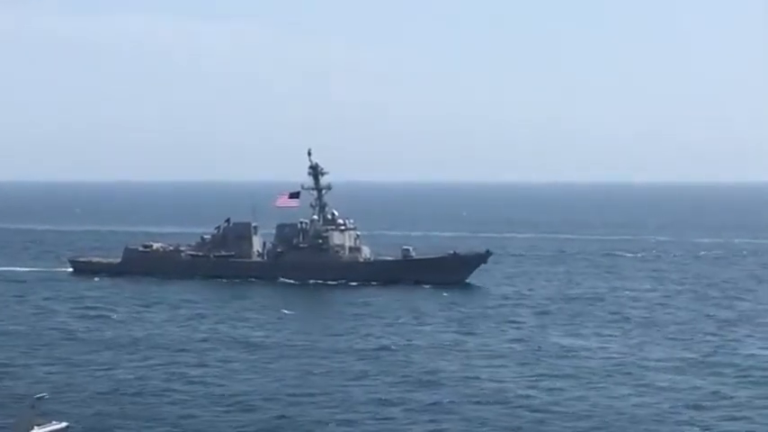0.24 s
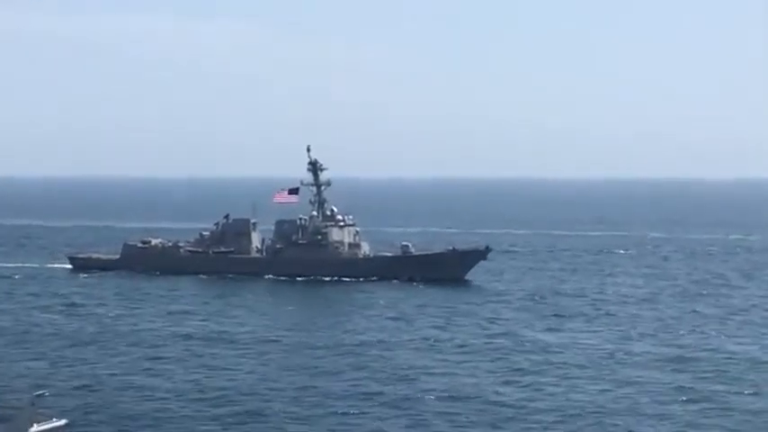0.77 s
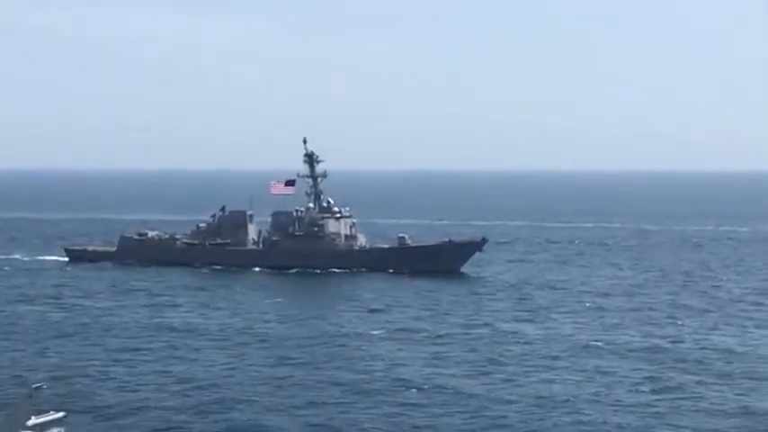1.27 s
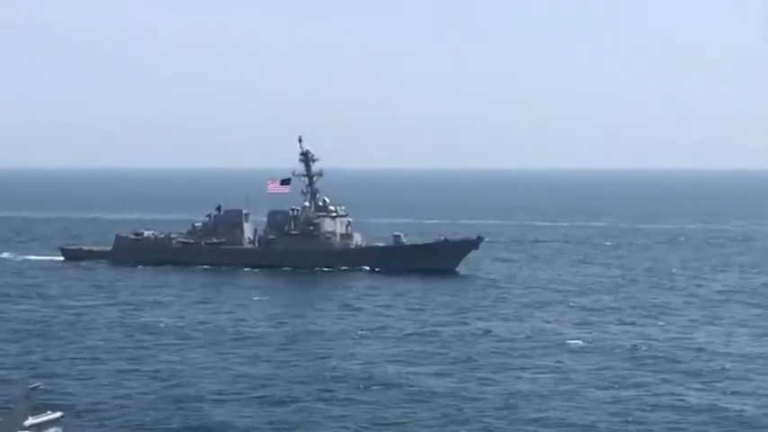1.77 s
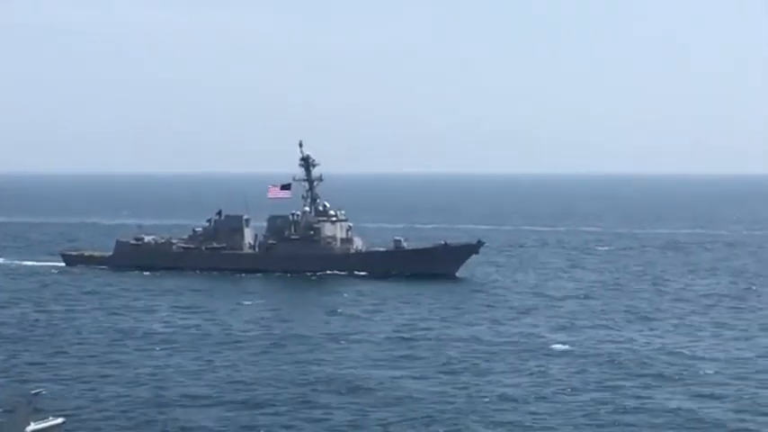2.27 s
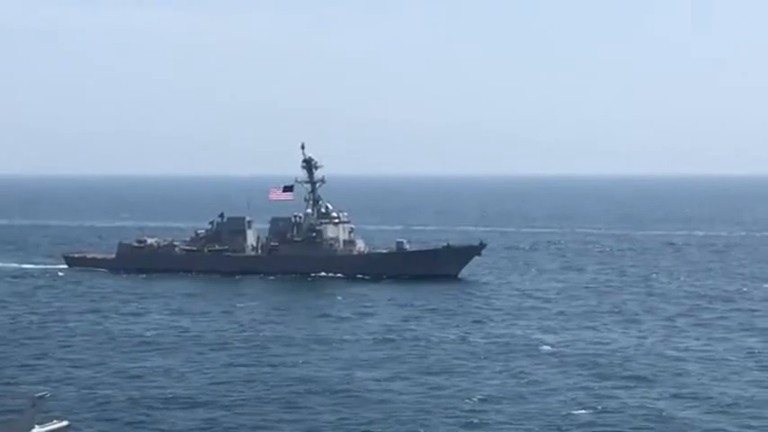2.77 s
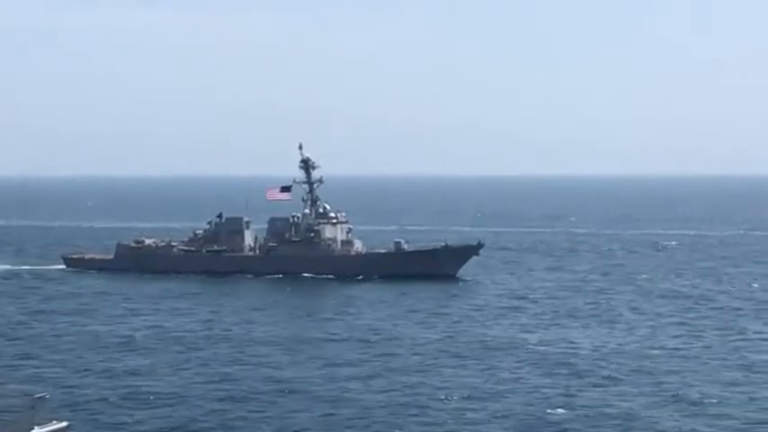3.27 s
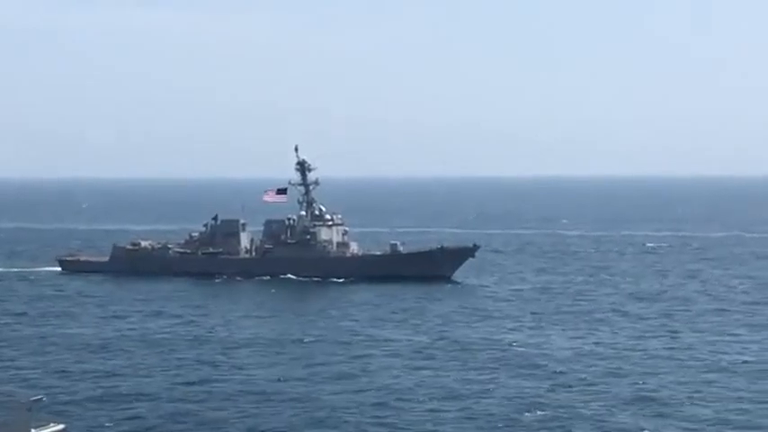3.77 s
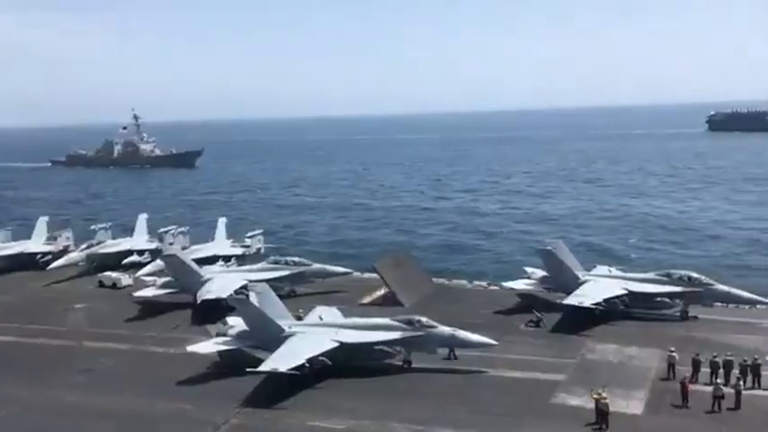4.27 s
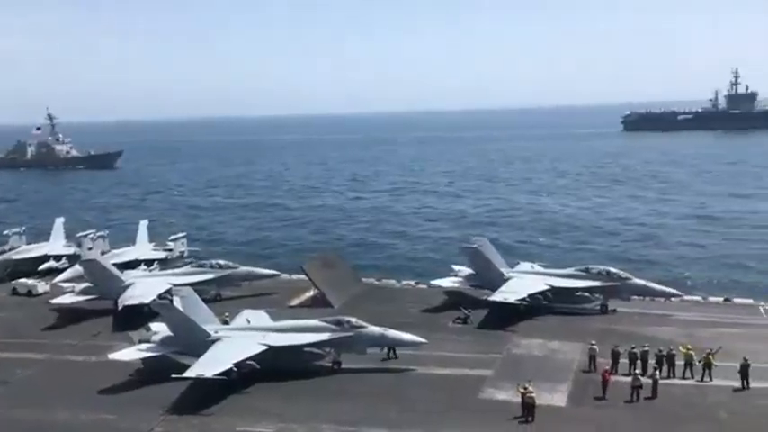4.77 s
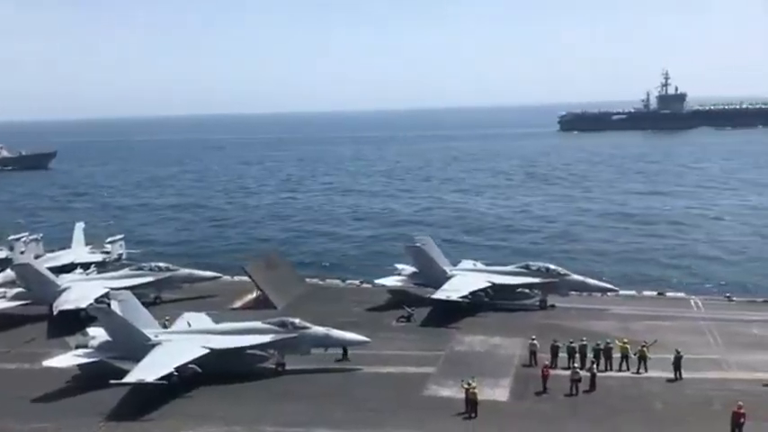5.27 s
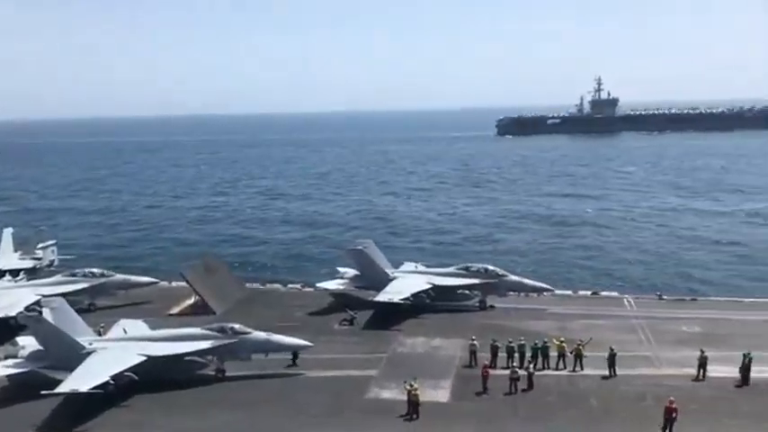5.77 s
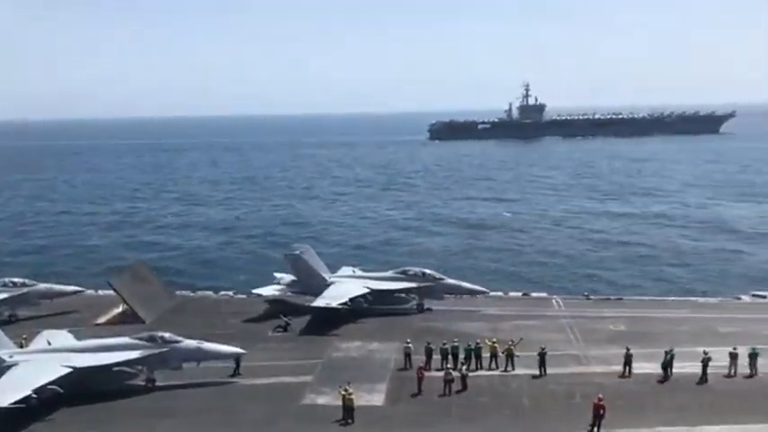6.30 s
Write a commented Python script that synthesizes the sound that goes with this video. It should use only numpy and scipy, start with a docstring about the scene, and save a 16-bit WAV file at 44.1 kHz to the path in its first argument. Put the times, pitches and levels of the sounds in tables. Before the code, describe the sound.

Wind thumps on a microphone above a flight deck at sea while idling turbines drone and whine, their high tones fluttering in the gusts. A faint hollow note rises just before a sudden change to the full exhaust roar of taxiing jets. The roar howls briefly, breaks off for a split second, and continues with a low throbbing underneath as the wind rumbles harder.

```python
"""A low drone and fuzzy whines that flare and fade in moving air: jet turbines idling on a carrier's
flight deck, heard from high above. Near 4 s the scene cuts to the full exhaust roar of taxiing jets,
turbulent noise with one short howl and a low throb. The sound drops out once for an instant.
Wind buffets the microphone throughout."""
import sys
import numpy as np
from scipy import signal
from scipy.fft import rfft, irfft
from scipy.io import wavfile

SR = 44100
rng = np.random.default_rng(int(sys.argv[2]) if len(sys.argv) > 2 else 0)


def inscribe(sig):
    """Save sig as 16-bit PCM at rate SR to the path in sys.argv[1].

    A 1-D sig is mono; a 2-D sig holds one channel per row.
    Samples are clipped to [-1, 1] before scaling.
    """
    pcm = np.round(np.clip(np.atleast_2d(sig).T, -1, 1) * 32767)
    wavfile.write(sys.argv[1], SR, pcm.astype(np.int16))


N = 288414
TIME = np.arange(N) / SR
HOP = 256
FRAME_S = np.arange(N // HOP + 6) * HOP / SR
BIN_HZ = np.fft.rfftfreq(4 * HOP, 1 / SR)
CUT_S = 3.9535  # idle to roar

# Exhaust spectrum: f/Hz, relative level/dB
ROAR_SPECTRUM = [(60, -16.5), (130, -6), (380, -5), (520, -5.5), (900, -4), (1450, -5.5), (1800, -5.5),
                 (2600, -8), (4200, -10.5), (4950, -14), (5900, -13), (7700, -19.5), (9400, -20),
                 (10450, -26), (11300, -23), (12400, -25.5)]
# Spectral hump, shifting as the jets turn: t/s, f/Hz, lift/dB
ROAR_HUMP = [(3.98, 900, 2.5), (4.2, 900, 2), (4.35, 900, 3), (4.68, 1000, 3.5), (4.9, 990, 4.5),
             (5.05, 980, 5.5), (5.28, 1000, 6.5), (5.42, 1000, 4.6), (5.62, 1002, 7.2), (5.86, 990, 3.5),
             (6.1, 970, 5), (6.4, 1000, 6.5)]
# Deck echo as the jets move: t/s, lag/ms
DECK_ECHO = [(4.0, 1.3), (4.2, 1.2), (4.7, 0.88), (5.4, 1.36), (6.5, 0.66)]
# Roar treble: t/s, level/dB
SIZZLE_LEVEL = [(4.03, -25.7), (4.14, -26.5), (4.31, -24.5), (4.58, -27.5), (4.73, -24), (4.88, -24),
                (5.04, -27.5), (5.14, -25), (5.44, -26), (5.56, -27), (5.72, -28), (5.88, -24),
                (6.1, -25.5), (6.5, -24.5)]

def exhaust_roar():
    """Jet mixing noise, lightly combed by the deck echo. The body eases off as the jets move away."""
    hump_hz, lift_db = follow(ROAR_HUMP, FRAME_S[:, None])
    hump_db = lift_db * bell(BIN_HZ, hump_hz, width=430)
    turn_away = np.exp(-abs(FRAME_S - CUT_S) / 0.49)
    shoulder_db = 2 * np.outer(turn_away, bell(BIN_HZ, 1550, width=720))
    lag_ms, = follow(DECK_ECHO, FRAME_S)
    comb_db = 0.5 * np.cos(2 * np.pi * np.outer(lag_ms / 1000, BIN_HZ)) * np.exp(-BIN_HZ / 5000)
    field_db = spectrum_at(ROAR_SPECTRUM, BIN_HZ) + hump_db + shoulder_db + comb_db
    jet = turbulence(field_db, patchy_db=1.4, patch_hz=80, patch_s=0.06)
    crossover_hz, fall_db_per_s = 2790, 0.64
    body = filtered(jet, lambda hz: 1 / (1 + (hz / crossover_hz) ** 4))
    sizzle_db, = follow(SIZZLE_LEVEL)
    sizzle = gain_of(sizzle_db + drift(rate_hz=35)) * unit_rms(jet - body)
    body_db = -20 - fall_db_per_s * (TIME - CUT_S) + 0.57 * drift(rate_hz=18)
    return gain_of(body_db) * unit_rms(body) + sizzle


# Throbbing bands: f/Hz, width/Hz, relative level/dB
BOOM_BANDS = [(170, 83, -3), (290, 60, -2.5)]
# Their swells: t/s, length/s, lower band lift/dB, upper band lift/dB
BOOM_LIFTS = [(4.6, 0.25, 14.5, 8), (5.008, 0.065, 12, 13), (5.4, 0.25, 2.5, 8.5), (5.76, 0.4, 11.5, 9),
              (6.18, 0.25, 8.5, 7)]

def exhaust_boom():
    """The largest exhaust eddies throb in two low bands."""
    out = 0
    for band, (hz, width_hz, band_db) in enumerate(BOOM_BANDS):
        swell_db = swells([(s, length_s, lifts[band]) for s, length_s, *lifts in BOOM_LIFTS])
        level_db = -36.5 + band_db + swell_db + 1.2 * drift(rate_hz=11)
        out += gain_of(level_db) * noise_band(hz, width_hz, steadiness=0.2)
    return out


def exhaust_howl():
    """The exhaust surges once in a hollow band."""
    surge = gain_of(-21) * bell(TIME, 4.108, width=0.064)
    return surge * noise_band(860, width_hz=480, steadiness=0.6)


# Intake spectrum: f/Hz, relative level/dB
HISS_SPECTRUM = [(500, -27), (1300, -6), (1700, 4.5), (2200, 1), (4600, -1.5), (4820, -5.5), (5020, 2.5),
                 (5400, -1.5), (5850, -2.5), (6500, -6.5), (7600, -10), (9000, -10.5), (10400, -16.5),
                 (11000, -13), (11800, -12.5), (12400, -14.5)]
# Gusts carrying the treble to the microphone: t/s, length/s, lift/dB
TREBLE_SURGES = [(.425, 0.068, 5), (.8, 0.25, 2.5), (1.97, 0.066, 2.5), (2.26, 0.11, 3), (2.69, 0.11, 6),
                 (3.0, 0.13, 4), (1.16, .2, 2), (3.72, .09, 1)]
# Compressor whines: f/Hz, width/Hz, level/dB, rms fading/dB
COMPRESSOR_WHINES = [(3020, 69, -51.5, -0.5), (5040, 102, -40, 2.2), (6055, 175, -47.5, 3),
                     (7070, 240, -50.5, 1.5), (8100, 220, -55.5, 1.5), (9050, 300, -61, 2)]
# Whines that flare on their own: f/Hz, width/Hz, flare width/Hz, base level/dB, rms flutter/dB
FLARING_WHINES = [(2010, 45, 8, -47, 1.5), (4018, 70, 80, -51, 2), (11350, 550, 550, -46, 2)]
# Flares of the low, middle and top whine: t/s, length/s, lift/dB
FLARES_LOW = [(0.413, .028, 12.5), (0.644, .03, 11), (1.294, .046, 14), (1.402, 0.04, 13.5),
              (2.22, 0.07, 9), (2.42, .04, 9), (2.66, .05, 8), (3.0, .04, 6)]
FLARES_MID = [(.79, 0.12, 8), (1.0, 0.06, 10), (1.2, .03, 11), (2.01, 0.1, 7), (3.053, .07, 11)]
FLARES_TOP = [(.41, 0.083, 3), (0.828, 0.054, 7), (1.243, 0.081, 11.5), (1.48, 0.093, 6), (1.772, .05, 8),
              (3.427, 0.1, 5.5), (3.68, 0.25, 4.5)]

def idle_intake():
    """Intake hiss and compressor whines, fluttering as the wind bends their path."""
    surge_db = swells(TREBLE_SURGES) + 0.47 * drift(rate_hz=10)
    sway = spectrum_at([(1500, 0.098), (5500, 1.0)], BIN_HZ)  # short waves bend most
    field_db = spectrum_at(HISS_SPECTRUM, BIN_HZ) + np.outer(np.interp(FRAME_S, TIME, surge_db), sway)
    out = gain_of(-34) * turbulence(field_db, patchy_db=1.5, patch_hz=600, patch_s=0.018)
    for hz, width_hz, base_db, fading_db in COMPRESSOR_WHINES:
        level_db = base_db + 0.95 * surge_db + fading_db * drift(rate_hz=75)
        out += gain_of(level_db) * noise_band(hz, width_hz, steadiness=0.087)
    for whine, flares in zip(FLARING_WHINES, (FLARES_LOW, FLARES_MID, FLARES_TOP)):
        hz, width_hz, flare_width_hz, base_db, flutter_db = whine
        level_db = base_db + flutter_db * drift(rate_hz=26)
        out += gain_of(level_db) * noise_band(hz, width_hz, steadiness=0.24)
        flare = np.sqrt(np.maximum(gain_of(swells(flares)) ** 2 - 1, 0))  # powers add
        out += gain_of(base_db) * flare * noise_band(hz, flare_width_hz, steadiness=1)
    return out * gain_of(0.5 * drift(rate_hz=71))


# Idle exhaust spectrum: f/Hz, relative level/dB
DRONE_SPECTRUM = [(60, -28), (115, -19), (140, -9), (172, 2), (225, 3), (330, -3.5), (410, -7.5), (550, -4),
                  (620, -10.5), (760, -8), (990, -7), (1200, -13.5), (1500, -18), (3000, -37.5)]
# Its low middle: t/s, lift/dB
DRONE_MID_LIFT = [(0, -0.5), (.55, -1), (.92, 0.5), (1.1, 2.6), (2.05, 2), (2.55, -4), (3.1, 2.5),
                  (3.55, -1), (3.9, 1)]
# Its bass swells and sags: t/s, length/s, lift/dB
DRONE_BASS_SWELLS = [(.53, 0.088, -4.5), (1.65, 0.27, 1.3), (2.15, 0.34, -0.8), (2.66, 0.19, -4),
                     (3.38, .1, -7), (3.85, .2, 1.5)]
# Hollow note: t/s, level/dB
MOAN_LEVEL = [(0, -50), (3.2, -44), (3.5, -35.5), (3.7, -36.5), (3.95, -40)]

def idle_drone():
    """Dull exhaust noise of idling engines. A hollow note rises out of it."""
    lift_db, = follow(DRONE_MID_LIFT, FRAME_S[:, None])
    mid_db = lift_db * bell(BIN_HZ, 516, width=320)
    bass_db = swells(DRONE_BASS_SWELLS, FRAME_S[:, None]) * (BIN_HZ < 350)
    field_db = spectrum_at(DRONE_SPECTRUM, BIN_HZ) + mid_db + bass_db
    drone = turbulence(field_db, patchy_db=1.2, patch_hz=60, patch_s=0.06)
    drone *= gain_of(-28.5 + 0.57 * drift(rate_hz=45))
    moan_db, = follow(MOAN_LEVEL)
    return drone + gain_of(moan_db) * noise_band(690, width_hz=70, steadiness=0)


# Buffeting spectrum: f/Hz, relative level/dB
WIND_SPECTRUM = [(15, -14), (30, -17), (52, -2), (85, 2.5), (120, -15), (200, -4), (500, -53)]
# Gusts and lulls: t/s, length/s, lift/dB
GUSTS = [(.29, 0.055, 7.5), (.7, 0.34, -4), (1.36, 0.17, 3), (1.65, 0.17, -10), (2.46, 0.26, 9),
         (2.69, 0.063, 8), (3.39, 0.1, 8), (3.8, 0.23, -6), (4.25, 0.4, 3), (5.09, .07, 7), (5.79, 0.29, 9)]

def wind():
    """Eddies buffet the microphone in low lumps, harder after the cut."""
    gust_db = np.where(TIME < CUT_S, -43, -38.5) + swells(GUSTS)
    rumble = filtered(rng.standard_normal(N), lambda hz: gain_of(spectrum_at(WIND_SPECTRUM, hz)))
    return gain_of(gust_db + 2 * drift(rate_hz=9)) * unit_rms(rumble)


# Diffuse hiss spectrum: f/Hz, relative level/dB
DIFFUSE_SPECTRUM = [(3400, -47), (4300, -20), (5600, -3.5), (7300, -13), (9400, -5), (10500, 1),
                    (11400, 3.5), (12400, -7)]

def diffuse_hiss():
    """Faint hiss, opposite in the two ears, widens the treble until just after the cut."""
    level_db = -48 + 1.6 * drift(rate_hz=16)
    hiss = turbulence(spectrum_at(DIFFUSE_SPECTRUM, BIN_HZ), patchy_db=4, patch_hz=700, patch_s=0.042)
    side = gain_of(level_db) * hiss * (TIME < 4.3)
    return np.array([side, -side])


def turbulence(field_db, patchy_db, patch_hz, patch_s):
    """Noise of rms 1 shaped by field_db, fading in random patches of time and frequency."""
    real, imag, patches = rng.standard_normal((3, len(FRAME_S), len(BIN_HZ)))
    taps = np.arange(-64, 65)
    blur = np.outer(bell(taps * HOP / SR, 0, patch_s), bell(taps * BIN_HZ[1], 0, patch_hz))
    patches = unit_rms(signal.fftconvolve(patches, blur, "same"))
    spectra = (real + 1j * imag) * gain_of(field_db + patchy_db * patches)
    _, noise = signal.istft(spectra.T, nperseg=4 * HOP, noverlap=3 * HOP)
    return unit_rms(noise[:N])


def noise_band(centre_hz, width_hz, steadiness):
    """A tone smeared by unsteady flow, rms 1. Steadiness (0 to 1) flattens its envelope."""
    band = filtered(rng.standard_normal(N), lambda hz: np.sqrt(bell(hz, centre_hz, width_hz)))
    power = abs(signal.hilbert(unit_rms(band))) ** 2
    return unit_rms(band / (power + 0.2) ** (steadiness / 2))


def drift(rate_hz):
    """Random wander of rms 1, up to about rate_hz."""
    hz = np.fft.rfftfreq(len(FRAME_S), HOP / SR)
    spectrum = rfft(rng.standard_normal(len(FRAME_S))) * (hz > 0) / (1 + (hz / rate_hz) ** 2)
    return np.interp(TIME, FRAME_S, unit_rms(irfft(spectrum, len(FRAME_S))))


def swells(rows, t=TIME):
    """Sum of bell-shaped lifts, in dB."""
    return sum(lift_db * bell(t, s, length_s) for s, length_s, lift_db in rows)


def bell(x, centre, width):
    """Gaussian of height 1; full width at half height, in the units of x."""
    return 2 ** -((2 * (x - centre) / width) ** 2)


def follow(rows, t=TIME):
    """Table columns interpolated at times t."""
    times, *columns = np.transpose(rows)
    return [np.interp(t, times, column) for column in columns]


def spectrum_at(points, hz):
    """Interpolates on a log-frequency axis."""
    point_hz, values = np.transpose(points)
    return np.interp(np.log(hz + 1), np.log(point_hz), values)


def filtered(x, gain):
    """Filters x by gain(hz)."""
    return irfft(rfft(x) * gain(np.fft.rfftfreq(N, 1 / SR)), N)


def gain_of(db):
    """dB to amplitude."""
    return 10 ** (np.asarray(db) / 20)


def unit_rms(x):
    """Scales to rms 1."""
    return x / np.sqrt(np.mean(x ** 2) + 1e-20)


def scene():
    """Idle cuts to roar, with wind throughout. Stereo."""
    hiss = diffuse_hiss()
    idling = idle_drone() + idle_intake()
    taxiing = exhaust_roar() + exhaust_boom() + exhaust_howl()
    return np.where(TIME < CUT_S, idling, taxiing) + wind() + hiss


def record(dry):
    """Soft clipping, one brief dropout, low-pass."""
    ceiling, cutoff_hz = gain_of(-6.8), 12430
    drop_from_s, drop_to_s, drop_db_per_s = 4.7585, 4.8426, 1400
    clipped = dry / (1 + (dry / ceiling) ** 4) ** 0.25
    dying = gain_of(-14 - drop_db_per_s * np.maximum(TIME - drop_from_s, 0))
    gate = np.where((TIME > drop_from_s) & (TIME < drop_to_s), dying, 1)
    lowpass = signal.firwin(801, cutoff_hz, window=("kaiser", 8), fs=SR)
    return signal.oaconvolve(clipped * gate, lowpass[None], "same", axes=1)


dry = scene()
out = record(dry)
inscribe(out)
```